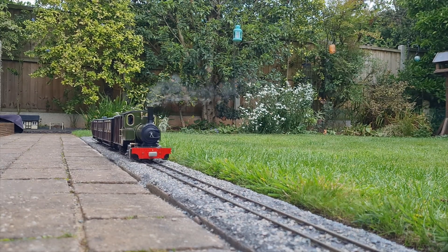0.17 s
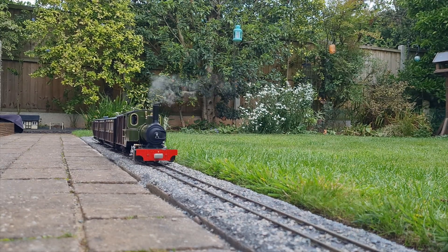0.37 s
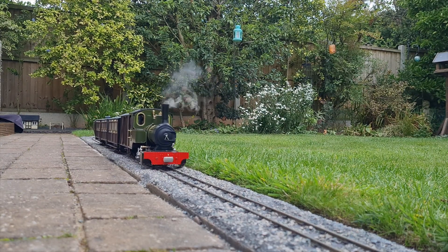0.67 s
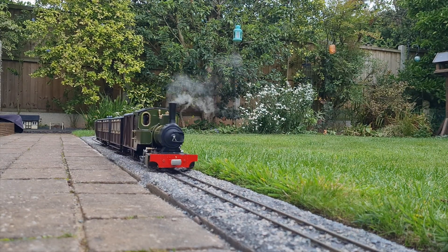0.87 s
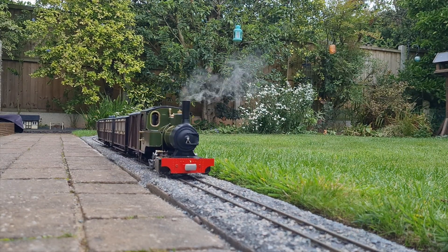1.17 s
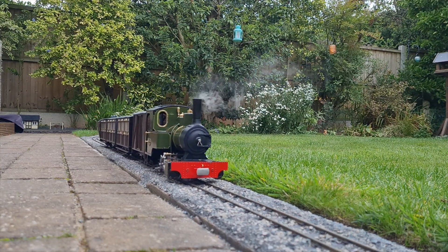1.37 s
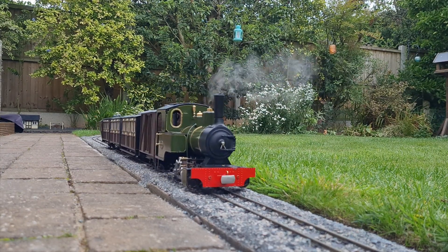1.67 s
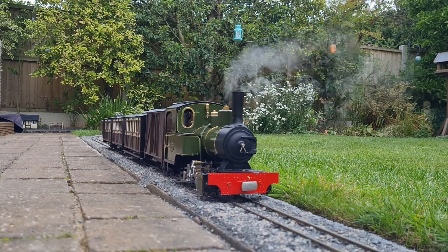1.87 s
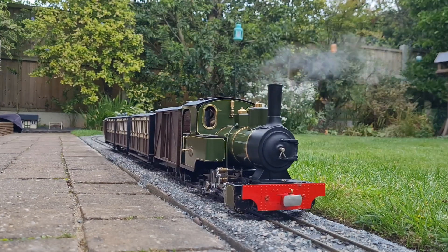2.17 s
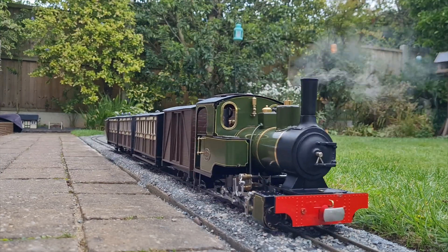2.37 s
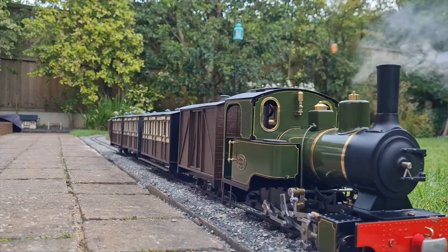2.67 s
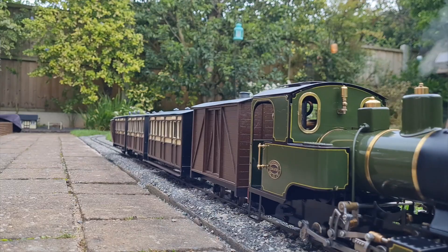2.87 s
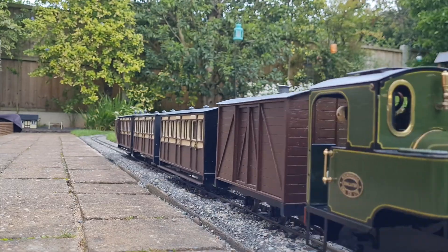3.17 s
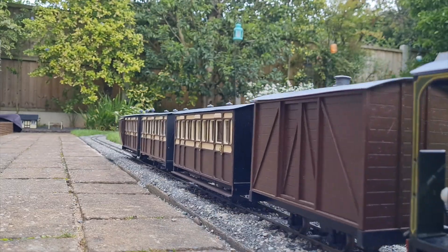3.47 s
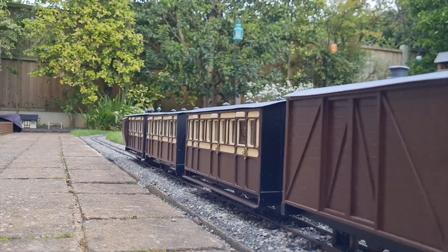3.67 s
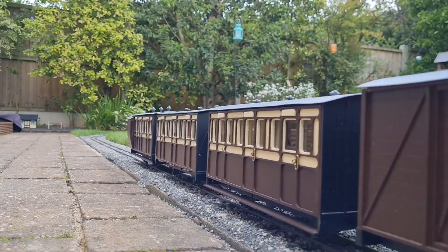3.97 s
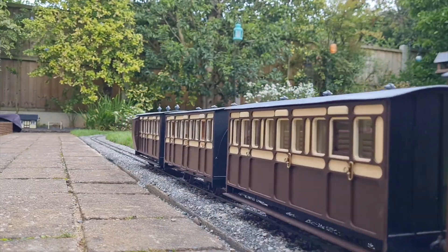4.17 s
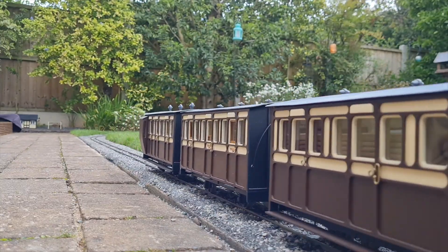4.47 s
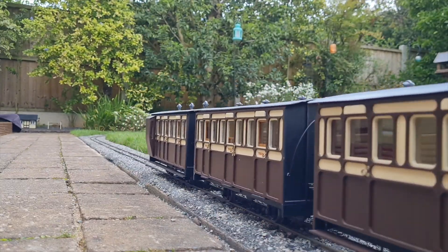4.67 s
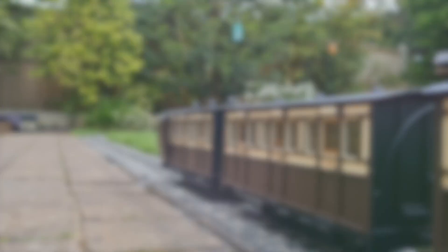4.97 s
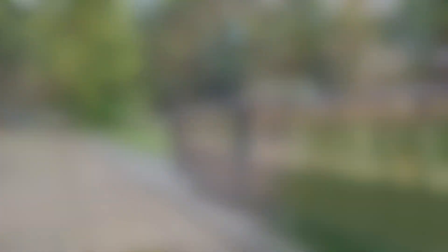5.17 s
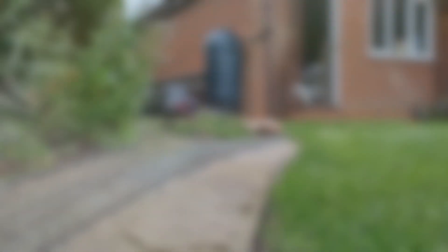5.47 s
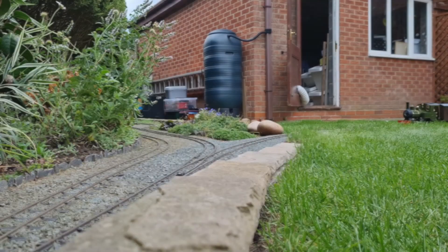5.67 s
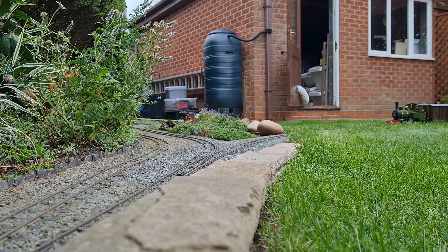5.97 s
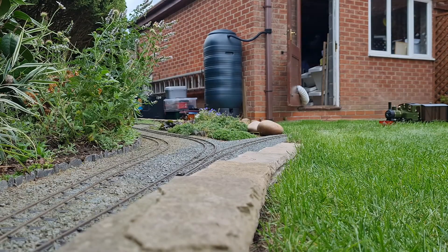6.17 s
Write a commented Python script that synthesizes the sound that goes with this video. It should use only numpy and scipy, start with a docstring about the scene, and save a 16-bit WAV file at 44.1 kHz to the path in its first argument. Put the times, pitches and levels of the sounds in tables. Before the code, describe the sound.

A small steam locomotive chuffs very rapidly, approaching and passing close on the right with hiss, drumming wheels and metallic rattles, then a quiet garden.

```python
"""A small live-steam locomotive's exhaust chuffs 13 to 14 times a second: noise swells through chimney
resonances. The burner's flame and flue are resonant noise throbbing with the blasts; steam leaks as a bright
hiss. Wheels drum, roar and rumble as coloured noise; loose metal rattles, chinks and knocks as struck modes. It
pulls a van and coaches along a garden track, passing close on the right of a low microphone. From about 5.5 s
only a faint far rumble and a quiet garden remain."""
import sys
import numpy as np
from scipy import signal
from scipy.fft import rfft, irfft, next_fast_len
from scipy.io import wavfile
from scipy.ndimage import uniform_filter1d, map_coordinates

SR = 44100
rng = np.random.default_rng(int(sys.argv[2]) if len(sys.argv) > 2 else 0)


def dump(signal):
    """Clip the signal to [-1, 1] and save it as 16-bit WAV at the path in sys.argv[1]."""
    limited = np.clip(np.atleast_2d(signal).T, -1, 1)
    pcm = np.round(limited * 32767).astype(np.int16)
    wavfile.write(sys.argv[1], SR, pcm)


N = 278712
TIME = np.arange(N) / SR
LENGTH = next_fast_len(N, real=True)
FREQS = np.maximum(np.fft.rfftfreq(LENGTH, 1 / SR), 1)

# loose couplings and axles: (time [s], level before offsets [dB])
RATTLE_LEVEL = [(0, -81), (1.5, -50), (2.5, -41), (3.5, -38.5), (4.2, -37.5), (4.35, -38.5), (5.03, -35.5),
                (5.15, -44.5), (5.42, -49.5), (5.55, -59), (6.32, -91)]


def from_db(db):
    """Decibels to gain."""
    return 10 ** (np.asarray(db) / 20)


def rms_one(x):
    """Scale to an rms of 1."""
    return x / np.sqrt(np.mean(x ** 2) + 1e-20)


def in_time(rows):
    """Each column of a curve at every sample."""
    s, *columns = np.transpose(rows)
    return [np.interp(TIME, s, column) for column in columns]


def drift(rate_hz):
    """Slow chance of rms 1: straight lines between random knots."""
    knots = np.arange(0, TIME[-1] + .1, 1 / rate_hz)
    return rms_one(np.interp(TIME, knots, rng.standard_normal(len(knots))))


def noise(spectrum, alike_hz, resonances=()):
    """Coloured stereo noise of rms 1; the sides are alike well below alike_hz and part ways above."""
    hz, db = np.transpose(spectrum)
    low_cut_db = 24 * np.maximum(np.log2(hz[0] / FREQS), 0)  # 24 dB per octave under the first point
    db = np.interp(np.log(FREQS), np.log(hz), db) - low_cut_db
    for centre_hz, width_hz, lift_db in resonances:
        db = db + lift_db / (1 + (2 * (FREQS - centre_hz) / width_hz) ** 2)
    gain = from_db(db)
    alike = 1 / (1 + FREQS / alike_hz)
    mid, side = rng.standard_normal((2, 2 * len(FREQS))).view(complex)
    mid = mid * gain * np.sqrt(1 + alike)
    side = side * gain * np.sqrt(1 - alike)
    return rms_one(irfft([mid + side, mid - side], LENGTH)[:, :N])


def waver(x, depth=.018, rate_hz=9, order=3):
    """Reading at a drifting speed makes the pitch of resonances waver by chance."""
    reading = np.cumsum(1 + depth * drift(rate_hz))
    return np.array([map_coordinates(side, [reading], order=order, mode="mirror") for side in x])


def ring(clicks, hz, t60_s):
    """A two-pole resonator: a unit click sets a decaying sine ringing."""
    r = from_db(-60 / (t60_s * SR))
    w = 2 * np.pi * min(hz, 16000) / SR
    return signal.lfilter([0, np.sin(w)], [1, -2 * r * np.cos(w), r * r], clicks + 1e-18)


def throb(power, depth):
    """A gain that follows each blast relative to the local mean power, whatever the distance."""
    pulse = power / (np.abs(uniform_filter1d(power, size=SR // 7)) + 1e-9)
    return np.sqrt(1 - depth + depth * pulse)


def pan(x, right_db):
    """Lean to the right at constant power."""
    ratio = from_db(right_db)
    return x * [np.ones(N), ratio] * np.sqrt(2 / (1 + ratio ** 2))


def place(x, bearing, pan_db, lag_s=0.000503):
    """The left hears a source on the right later and quieter; one on the left reaches it sooner."""
    left, right = pan(x, np.maximum(bearing, 0) * pan_db)
    return np.array([np.interp(TIME - bearing * lag_s, TIME, left), right])


def shade(x, bearing, shadow_db=11.5, shadow_hz=4200, even_bearing=0.25):
    """The microphone's body keeps the treble from the far side."""
    low = signal.sosfiltfilt(signal.butter(2, shadow_hz, fs=SR, output="sos"), x)
    return low + pan(x - low, (bearing - even_bearing) * shadow_db)


def ground_echo(x, far_lag_s=0.000865, near_lag_s=.0026, echo_db=-13, right_extra_s=0.000668):
    """A bounce off the paving combs the sound; its detour is longest as the engine passes."""
    lag_s = far_lag_s + (near_lag_s - far_lag_s) / (1 + ((TIME - 3.5) / 0.794) ** 2)
    extras_s = (0, right_extra_s)
    echo = np.array([np.interp(TIME - lag_s - extra, TIME, side) for side, extra in zip(x, extras_s)])
    return (x + from_db(echo_db) * echo) / np.hypot(1, from_db(echo_db))


def breeze():
    """Air stirring at the microphone: low noise of drifting level."""
    # (time [s], level [dB])
    air_level = [(0, -56.5), (.8, -54), (1.9, -57), (2.7, -59), (3.5, -53), (5.6, -66), (6.32, -71)]
    spectrum = [(25, -13), (55, 2), (90, -11), (300, -19), (1000, -68)]
    return from_db(in_time(air_level)[0] + 2 * drift(5.4)) * noise(spectrum, alike_hz=60)


def thumps():
    """Soft thumps at the microphone: low noise under Gaussian swells."""
    # (time [s], peak level [dB], half length to 1/e [s])
    swells = [(1.295, -43, 0.03), (5.717, -46, 0.052)]
    swell = sum(from_db(db) * np.exp(-((TIME - s) / half_s) ** 2) for s, db, half_s in swells)
    spectrum = [(30, -10), (70, -5), (115, -5), (250, -23), (1000, -70)]
    return swell * from_db(3.3 * drift(60)) * noise(spectrum, alike_hz=500)


def garden(hiss_db=-49.5):
    """Faint steady outdoor hiss, a light breeze and two soft thumps."""
    # (frequency [Hz], relative density [dB per Hz])
    hiss_spectrum = [(25, -7), (100, 10), (300, 18), (470, 17), (750, 6), (1250, -3), (1550, 3.5),
                     (2200, -17), (3100, -9), (4300, 7.5), (7000, 6), (8200, -5.5), (10000, 5.5),
                     (16000, 1)]
    return from_db(hiss_db) * noise(hiss_spectrum, alike_hz=1500) + breeze() + thumps()


def track_bed(gain_db=-3.5):
    """Rough rails make the track bed rumble: deep noise."""
    # (time [s], level before gain_db [dB])
    bed_level = [(0, -54.5), (2.6, -44), (3.6, -38.5), (4.15, -38), (4.68, -29.5), (5.1, -34.5),
                 (5.45, -44.5), (5.8, -77), (6.32, -65)]
    # (frequency [Hz], relative density [dB per Hz])
    rumble_spectrum = [(20, -34), (40, -30), (62, -6.5), (100, -7), (142, 1), (185, -12.5), (260, -8.5),
                       (500, -67)]
    return from_db(in_time(bed_level)[0] + gain_db) * noise(rumble_spectrum, alike_hz=1500)


def drumming(lumps_db=1.67, lumps_hz=9):
    """Rough rails make the hollow bodies drum: resonant noise of wavering pitch."""
    # (time [s], level [dB])
    drum_level = [(0, -38), (1.05, -38.5), (1.2, -37), (1.95, -34.5), (2.1, -31), (2.3, -38), (2.8, -34.5),
                  (3.0, -31), (3.6, -34.5), (3.85, -28.5), (4.1, -33), (4.45, -28.5), (4.6, -29),
                  (4.72, -26.5), (5.05, -22), (5.22, -29), (5.38, -28.5), (5.56, -43), (5.8, -54),
                  (6.1, -48.5), (6.32, -61)]
    # (frequency [Hz], relative density [dB per Hz])
    drum_spectrum = [(120, -22), (190, -12), (240, -4.5), (285, -0.5), (316, 2.5), (360, -5), (420, -9.5),
                     (520, -15), (800, -48)]
    body = waver(noise(drum_spectrum, alike_hz=7040), depth=.04, rate_hz=7, order=1)
    # many wheels keep the drive even
    body /= np.sqrt(uniform_filter1d(np.mean(body ** 2, axis=0), size=SR // 8))
    return from_db(in_time(drum_level)[0] + lumps_db * drift(lumps_hz)) * body


def tread_roar(uneven_db=2.0):
    """Treads roar on the rails: noise of uneven level."""
    # (time [s], level [dB])
    roar_level = [(0, -47.5), (1.1, -42.5), (1.7, -42), (2.8, -38), (3.3, -35.5), (4.05, -34), (4.3, -33),
                  (4.85, -30.5), (5.42, -39.5), (5.75, -66), (6.13, -57), (6.32, -57)]
    # (frequency [Hz], relative density [dB per Hz])
    roar_spectrum = [(250, -6), (480, 4), (640, 7.5), (730, 5), (880, 8.5), (1300, 2), (1530, 2),
                     (1950, -3), (2450, -6), (3300, -7.5), (4400, -10.5), (6000, -35), (8300, -40),
                     (16000, -51)]
    return from_db(in_time(roar_level)[0] + uneven_db * drift(56)) * noise(roar_spectrum, alike_hz=1710)


def running_gear(clicks, spread_db=-2.0):
    """Every contact excites the modes with new strengths, differently towards each side."""
    # (frequency [Hz], level [dB], t60 [s])
    gear_modes = [(634, -25, 0.013), (1390, -2.5, 0.0079), (2660, -11.5, 0.024), (4670, 1.5, 0.0047),
                  (5500, 4.5, 0.0085), (6600, -1, 0.0059), (9900, -2, 0.0044), (12100, -14, 0.0024),
                  (13200, -5, 0.0033), (14600, -11, .002)]
    at = np.flatnonzero(clicks)
    out = np.zeros((2, N))
    for hz, db, t60_s in gear_modes:
        strikes = np.zeros((2, N))
        signs = rng.choice([-1, 1], len(at))
        strengths_db = db + spread_db * rng.standard_normal((2, len(at)))
        strikes[:, at] = clicks[at] * signs * from_db(strengths_db)
        out += ring(strikes, hz, t60_s)
    return out


def rattle(per_s=380, size_db=3.5, grate_db=-4, grit_db=5.0, clump_db=3):
    """Tiny contacts of axles and couplings come in clumps, while the flanges grate in short bursts."""
    # flanges on the rails: (frequency [Hz], relative density [dB per Hz])
    grate_spectrum = [(400, 16), (1900, 17), (2500, 7), (3400, 19), (5500, 12), (6900, 4), (7600, -11),
                      (10000, -22), (16000, -23)]
    born = rng.random(N) < per_s * from_db(clump_db * drift(40)) / SR
    sizes = from_db(size_db * np.minimum(rng.exponential(1, N), 4))
    contacts = rms_one(running_gear(born * sizes))
    grating = rms_one(from_db(grit_db * drift(500)) * noise(grate_spectrum, alike_hz=1500))
    return from_db(in_time(RATTLE_LEVEL)[0]) * rms_one(contacts + from_db(grate_db) * grating)


def pings(per_s=190, ping_db=-2.5, size_db=4, low_hz=2300, high_hz=11000, ring_cycles=55):
    """Small loose parts chink at random: decaying sines, each at a pitch of its own."""
    born = np.flatnonzero(rng.random(N) < per_s / SR)
    age_s = np.arange(SR // 16) / SR
    out = np.zeros((2, N + len(age_s)))
    for at, (pitch, left, right) in zip(born, rng.random((len(born), 3))):
        hz = low_hz * (high_hz / low_hz) ** pitch
        sizes = from_db(size_db * np.minimum(-np.log([[left], [right]]), 3))
        decay = from_db(-60 * age_s * hz / ring_cycles)
        out[:, at:at + len(age_s)] += sizes * decay * np.sin(2 * np.pi * hz * age_s)
    return from_db(in_time(RATTLE_LEVEL)[0] + ping_db) * rms_one(out[:, :N])


def knocks(body_db=-19, crack_db=-3, graze_s=0.00048, bounce_s=0.0044, bounce_db=-8,
           ring_t60_s=.026, pair_split=.035):
    """A wheel, rod or coupling grazes, then strikes: a crack, a pair of close modes and one bounce."""
    # (time [s], strike level before offsets [dB], crack decay [s], ring pitch [Hz], ring re strike [dB])
    strikes = [(2.241, -21, .003, 11300, -8), (2.74, -29, 0.0026, 1600, 6), (3.387, -15, 0.0032, 7100, -3),
               (3.392, -17, 0.0018, 11400, -5), (3.452, -17, 0.0025, 4530, -12),
               (3.536, -16, .0015, 4400, -7), (3.827, -14, 0.0033, 4580, -28),
               (3.912, -17, 0.0023, 4430, -16), (3.973, -18.5, 0.0085, 4450, 0),
               (4.052, -20.5, 0.0022, 1640, 2.5), (4.123, -16.5, 0.0055, 4320, -4),
               (4.278, -23, .002, 4270, -13), (4.304, -16.5, 0.0011, 4400, -4),
               (4.3228, -16, 0.0022, 10600, -16), (4.401, -20, 0.0013, 9900, -18),
               (4.416, -23, 0.002, 4400, -17), (4.455, -14, .001, 6760, -14),
               (4.463, -15.5, .0015, 5450, -3), (4.472, -16, .001, 5250, -13),
               (4.491, -14.5, 0.0064, 9570, -4.5), (4.505, -20, 0.0024, 9800, -5),
               (4.655, -26, .001, 5200, 0), (4.662, -23, 0.00092, 6000, -1), (4.682, -19, 0.0032, 3600, -5),
               (4.689, -17.5, 0.0046, 9750, -5), (4.739, -28, 0.00085, 5700, -4),
               (4.788, -20.5, 0.0019, 3740, -4), (4.827, -19.5, 0.0047, 3680, -2),
               (4.842, -12, 0.0049, 5130, -10), (4.865, -20, 0.0013, 6200, -18),
               (4.886, -36, .001, 5000, -5), (4.897, -18.5, 0.0015, 10000, -18),
               (4.942, -26, 0.0016, 6900, -5), (4.955, -21, 0.0013, 10600, -2.5),
               (4.961, -28, 0.0015, 10600, -14), (4.974, -26, .0015, 10500, -17),
               (4.988, -20, .002, 9800, -9), (4.994, -30, .0015, 6600, 6), (5.0113, -11, 0.0027, 6300, -7),
               (5.036, -21.5, 0.0099, 6400, -4), (5.060, -22, 0.0019, 10500, -16),
               (5.138, -23, 0.0012, 5800, -5), (5.195, -26, 0.0017, 6100, -18),
               (5.329, -31, 0.0026, 4600, -1), (5.447, -25, 0.0019, 4600, -4.5)]
    # steel on steel: (frequency [Hz], relative density [dB per Hz])
    crack_spectrum = [(500, 11.5), (1500, 3), (3500, 3.5), (6500, 4.5), (7700, -6.5), (10000, -0.5),
                      (13000, -2), (16000, -5)]
    clicks, crack, tones = np.zeros(N), np.zeros(N), np.zeros(N)
    for (s, db, crack_s, hz, ring_db), chance in zip(strikes, rng.random(len(strikes))):
        clicks[int(s * SR)] += from_db(db)
        clicks[int((s + bounce_s * (.5 + chance)) * SR)] += from_db(db + bounce_db)
        near = slice(int((s - .01) * SR), int((s + .06) * SR))
        before_s = np.maximum(s - TIME[near], 0)
        after_s = np.maximum(TIME[near] - s, 0)
        crack[near] += from_db(db) * np.exp(-before_s / graze_s - after_s / crack_s)
        pair_hz = [hz * (1 + side * pair_split / 2) for side in (-1, 1)]
        pair = sum(np.sin(2 * np.pi * mode_hz * after_s) for mode_hz in pair_hz) / np.sqrt(2)
        tones[near] += from_db(db + ring_db - 60 * after_s / ring_t60_s) * pair
    cracks = from_db(crack_db) * crack * noise(crack_spectrum, alike_hz=2000)
    return from_db(body_db) * running_gear(clicks) + tones + cracks


def leak(flutter_db=2.35):
    """Steam leaking at cylinders and glands: a bright hiss with a slight sputter."""
    # (time [s], level [dB])
    leak_level = [(0, -48), (.55, -46.5), (.9, -45.5), (1.6, -45.5), (2.2, -40.5), (2.6, -40), (3, -35),
                  (3.35, -32), (3.8, -35), (4.2, -35), (4.55, -38.5), (5, -43.5), (6.32, -95)]
    # (frequency [Hz], relative density [dB per Hz])
    leak_spectrum = [(1500, 8.5), (3000, 13), (4300, 8), (5500, 6), (7000, 8.5), (8300, -0.5), (9200, -7),
                     (10300, 0.5), (12000, 10), (16000, 1.5)]
    return from_db(in_time(leak_level)[0] + flutter_db * drift(120)) * noise(leak_spectrum, alike_hz=1190)


def burner(power, flutter_db=1.5, flue_draught=0.65, flame_draught=0.12):
    """Each blast draws the fire: the flame roars and the flue sings in time with the puffs."""
    # (time [s], flue singing level [dB], flame roar level [dB])
    burner_levels = [(0, -45.5, -57), (.8, -50, -48), (1.6, -47.5, -49.5), (2.3, -46.5, -42),
                     (3.1, -37, -42.5), (3.6, -76, -42), (4.4, -34.5, -52), (5.1, -53, -79),
                     (5.6, -95, -95)]
    # resonances: (centre [Hz], width [Hz], lift [dB])
    flue = (2435, 710, 15)
    flame = (1177, 420, 11.5)
    sing_db, roar_db = in_time(burner_levels)
    sing = noise([(1700, 4), (3000, -2), (6000, -11)], alike_hz=3000, resonances=[flue])
    roar = noise([(800, 7), (2000, 4), (5000, -34)], alike_hz=3000, resonances=[flame])
    sing = from_db(sing_db) * throb(power, flue_draught) * waver(sing)
    roar = from_db(roar_db) * throb(power, flame_draught) * roar
    return (sing + roar) * from_db(flutter_db * drift(70))


def beats(first_beat_s=0.03, limp_db=.5, scatter_db=.6):
    """The wheels open the ports in turn, four to a turn: rows of (time [s], level [dB])."""
    # (start [s], exhaust beats per second [Hz])
    pace = [(0, 12.916), (.655, 13.504), (1.247, 14.086), (3.235, 13.276), (4.139, 14.203)]
    # top of a puff: (time [s], level before the ahead and alongside gains [dB])
    puff_level = [(0, -42), (.42, -44), (.7, -39), (1.0, -40.5), (1.55, -42), (1.8, -32), (2.12, -30.5),
                  (2.35, -28), (2.58, -28), (2.68, -30.5), (2.82, -28), (3.05, -27.5), (3.3, -26),
                  (3.55, -24.5), (3.72, -19.5), (3.88, -21), (3.99, -23), (4.06, -26), (4.15, -24),
                  (4.35, -26.5), (4.6, -31), (4.95, -53)]
    # uneven valves, every other beat early, the next late: (time [s], shift [s])
    limp_shift = [(3.6, 0.0014), (3.95, 0.0028)]
    starts_s, per_s = np.transpose(pace)
    phase = np.cumsum(per_s[np.searchsorted(starts_s, TIME, side="right") - 1]) / SR
    first, last = np.interp([first_beat_s, puff_level[-1][0]], TIME, phase)
    openings = np.arange(first, last)
    limp = (-1) ** np.arange(len(openings))  # 1 early and stronger, -1 late and weaker
    s = np.interp(openings, phase, TIME)
    s = s - np.interp(s, *np.transpose(limp_shift)) * limp
    scatter = scatter_db * rng.standard_normal(len(s))
    return zip(s, np.interp(s, *np.transpose(puff_level)) + limp_db * limp + scatter)


def blasts(rise_s=0.0083, hold_s=0.004, fall_s=0.018):
    """Blast-pipe steam power: at each opening a quick swell, a short hold, then a bleed away."""
    power = np.zeros(N)
    for s, db in beats():
        near = slice(max(int((s - .05) * SR), 0), int((s + .1) * SR))
        age_s = TIME[near] - s
        rise = (np.minimum(age_s, 0) / rise_s) ** 2
        fall = (np.maximum(age_s - hold_s, 0) / fall_s) ** 1.3
        power[near] += from_db(db) ** 2 * np.exp(-rise - fall)
    return power


def speak(puffs, bands_hz=((1400, 1700), (3950, 4350), (4350, 4750)), change_db=2.0, rate_hz=14):
    """The pipe resonances drift in strength at about the pace of the puffs."""
    for band_hz in bands_hz:
        part = signal.sosfiltfilt(signal.butter(1, band_hz, "band", fs=SR, output="sos"), puffs)
        puffs = puffs + part * (from_db(change_db * drift(rate_hz)) - 1)
    return puffs


def exhaust(power, ahead_db=5, alongside_db=-2.0, sputter_db=1.5, garden_db=-6.5, garden_s=0.038):
    """Each blast of steam rushes up the chimney and excites its resonances."""
    # (frequency [Hz], ahead relative density [dB per Hz], alongside relative density [dB per Hz])
    blast = [(155, 7, -8), (400, -3.5, -14.5), (684, -15, -11.5), (1140, -8, -10.5), (2000, -7, -5.5),
             (2800, 0, -7.5), (3100, -5, -12), (4800, 1, -12), (6470, -13.5, -15.5), (8500, -16, -25.5),
             (11200, -8, -22), (16000, -24, -24)]
    # chimney and blast pipe: (centre [Hz], width [Hz], lift ahead [dB], lift alongside [dB])
    chimney = [(867, 69, 20, 4.5), (1535, 68, 10, 8), (2350, 530, 10.5, -28), (4050, 230, -10, 10.5),
               (4434, 420, 10.5, 12.5), (7380, 1250, 17, -4), (9180, 390, 14.5, 15.5)]
    # (time [s], share of the power heard from alongside [0..1])
    alongside_share = [(0, 0.84), (1.5, 0), (1.9, 0.89), (2.3, 0.91), (2.9, 0.94), (3.5, 0.98), (6.32, 1)]
    # from afar, scatter off fence and shrubs fills the gaps between puffs
    keep = np.exp(-1 / (garden_s * SR))
    scatter = signal.lfilter([1 - keep], [1, -keep], power)
    far_power = power + from_db(garden_db) ** 2 * scatter
    ahead = noise([(hz, db) for hz, db, _ in blast], alike_hz=3140,
                  resonances=[(hz, width, db) for hz, width, db, _ in chimney])
    beside = noise([(hz, db) for hz, _, db in blast], alike_hz=3180,
                   resonances=[(hz, width, db) for hz, width, _, db in chimney])
    share = in_time(alongside_share)[0]
    puffs = from_db(ahead_db) * np.sqrt((1 - share) * far_power) * ahead
    puffs = puffs + from_db(alongside_db) * np.sqrt(share * power) * waver(beside)
    return puffs * from_db(sputter_db * drift(200))


def scene(treads_behind=0.57):
    """The engine swings to the right first; the carriages follow."""
    # (time [s], engine bearing [0 = straight ahead, 1 = beside the right ear])
    engine_bearing = [(0, -0.28), (1.5, -0.11), (2.3, -0.0099), (2.9, 0.35), (3.3, 0.68), (3.7, 1),
                      (4.4, 0.86), (5.3, 0.91), (5.8, 0.45), (6.32, 0.032)]
    # (time [s], bearing of the train's middle [same scale])
    train_bearing = [(0, -0.58), (2, -0.2), (3.3, -0.38), (4.2, 0.26), (4.8, 0.61), (5.3, 0.73),
                     (5.7, 0.41), (6.32, 0.43)]
    # rattle from the rods, in time with the beats: (time [s], share of power [0..1])
    rod_share = [(4.15, .4), (4.35, 0)]
    engine = in_time(engine_bearing)[0]
    train = in_time(train_bearing)[0]
    loudest_wheels = engine + treads_behind * (train - engine)
    power = blasts()
    low = place(drumming(), train, pan_db=9) + place(track_bed(), engine, pan_db=8.5)
    treads = place(tread_roar(), loudest_wheels, pan_db=7.0)
    loose = (rattle() + pings()) * throb(power, in_time(rod_share)[0])
    metal = place(loose + knocks(), engine, pan_db=8.0)
    cylinders = place(leak() * throb(power, depth=0.067), engine, pan_db=0.5)
    boiler = place(burner(power), engine, pan_db=0)
    chimney = place(ground_echo(speak(exhaust(power))), engine, pan_db=1.5)
    return garden() + low + shade(treads + metal + cylinders + boiler + chimney, engine)


def record(dry, cutoff_hz=16100):
    """The top is cut steeply."""
    gain = 1 / np.sqrt(1 + (FREQS / cutoff_hz) ** 400)
    return irfft(rfft(dry, LENGTH) * gain, LENGTH)[:, :N]


dry = scene()
out = record(dry)
dump(out)
```